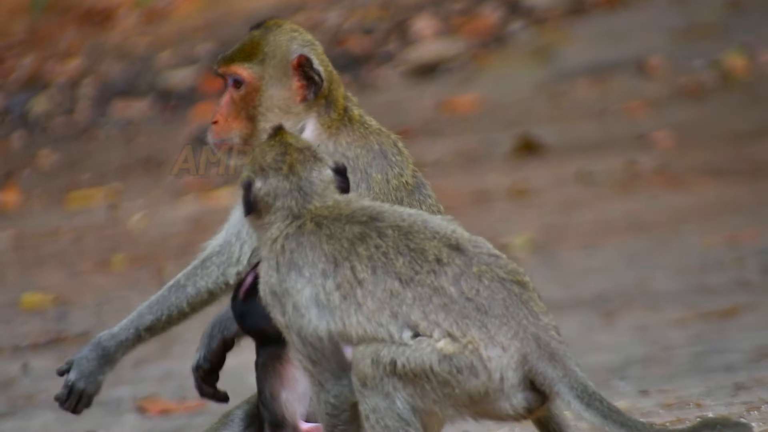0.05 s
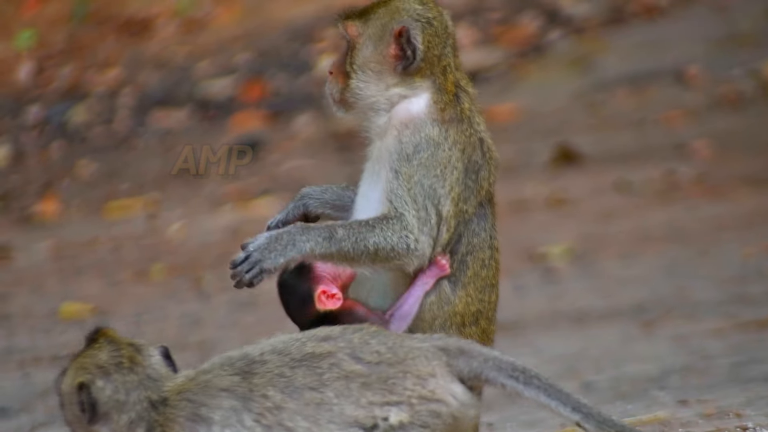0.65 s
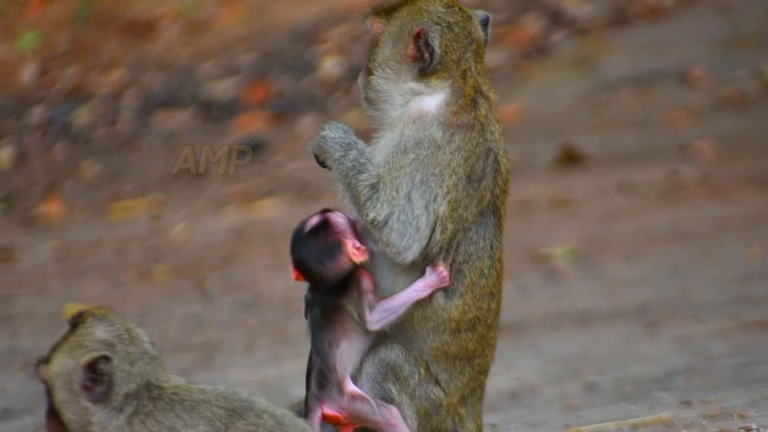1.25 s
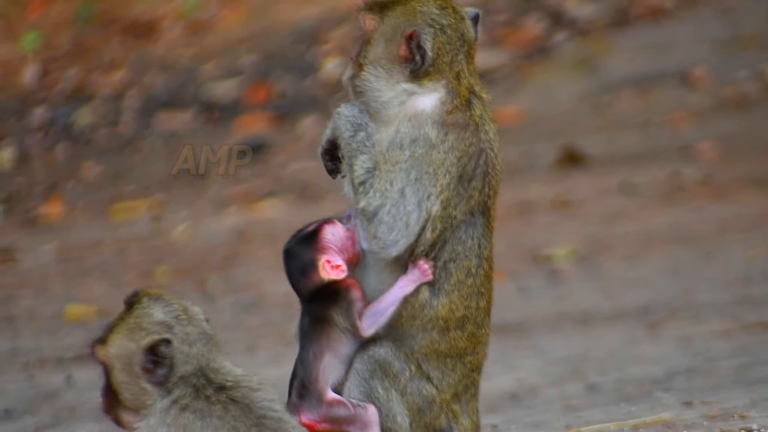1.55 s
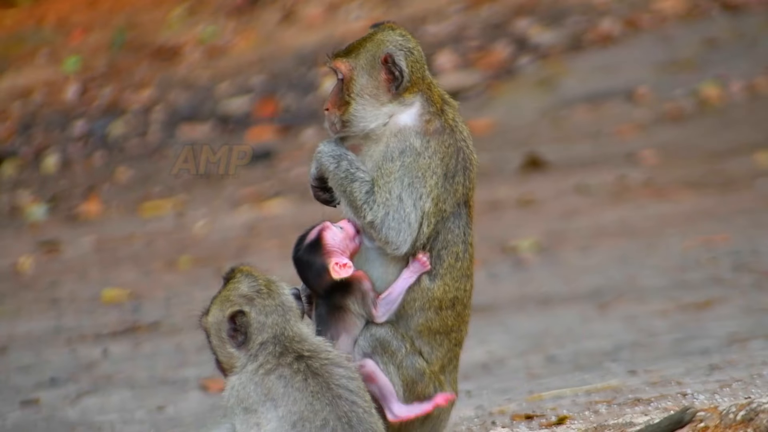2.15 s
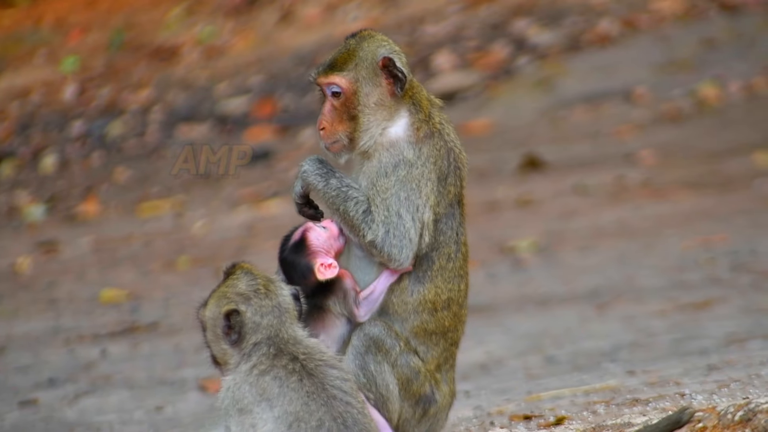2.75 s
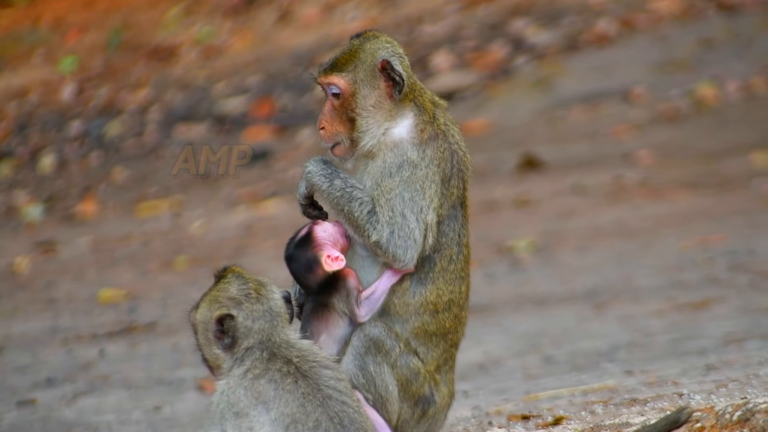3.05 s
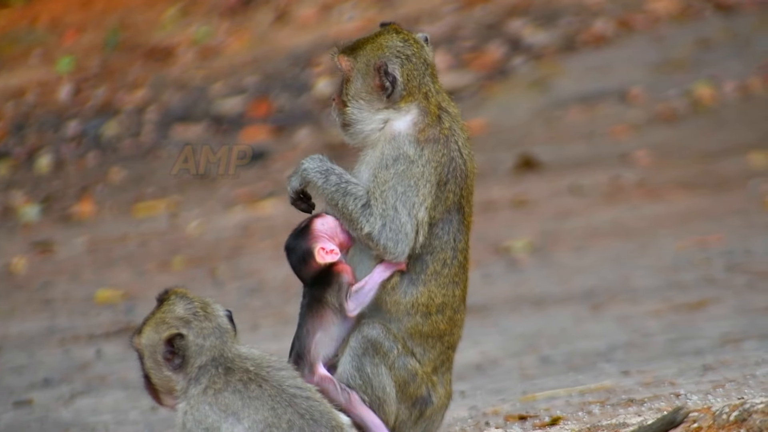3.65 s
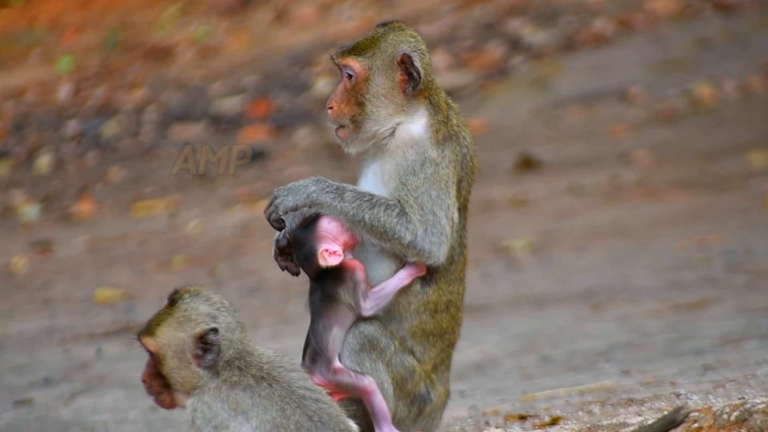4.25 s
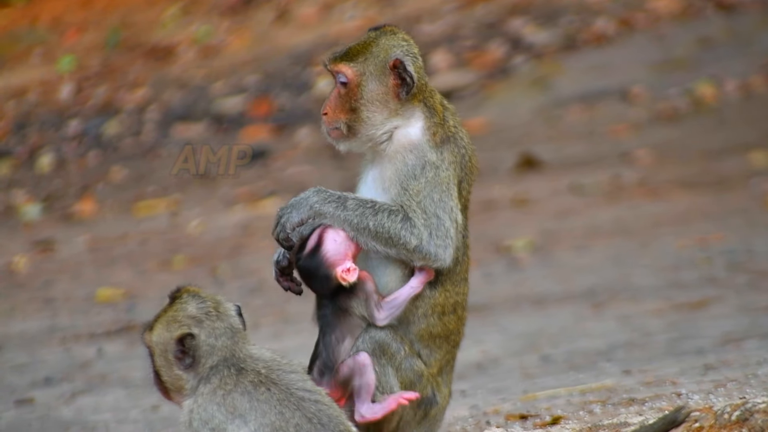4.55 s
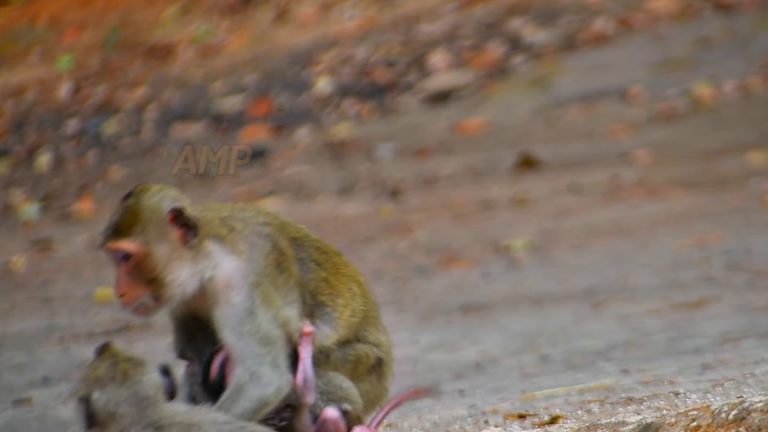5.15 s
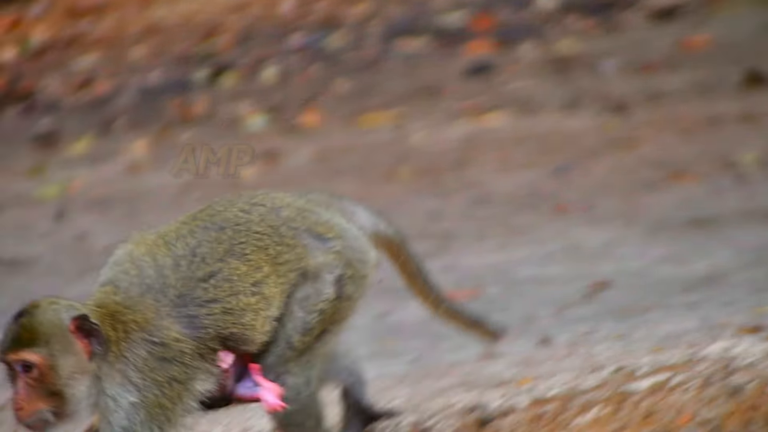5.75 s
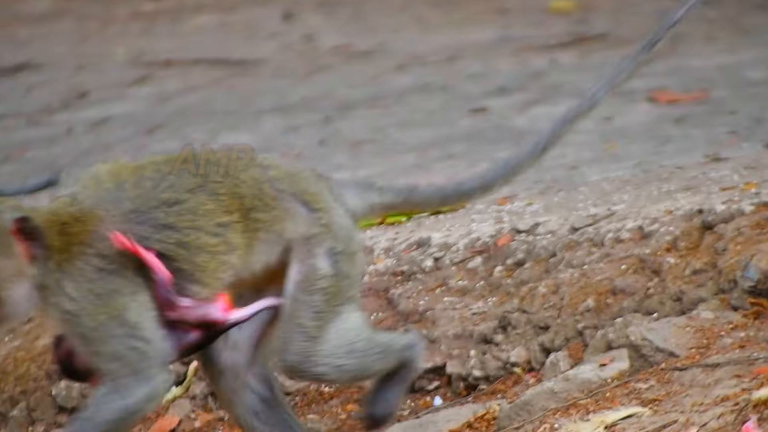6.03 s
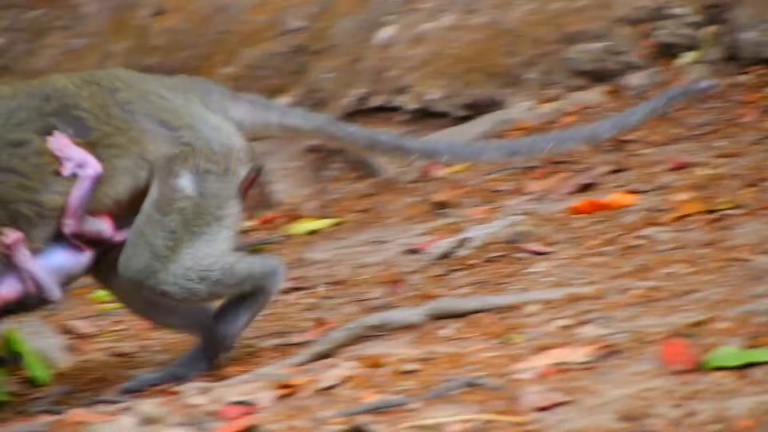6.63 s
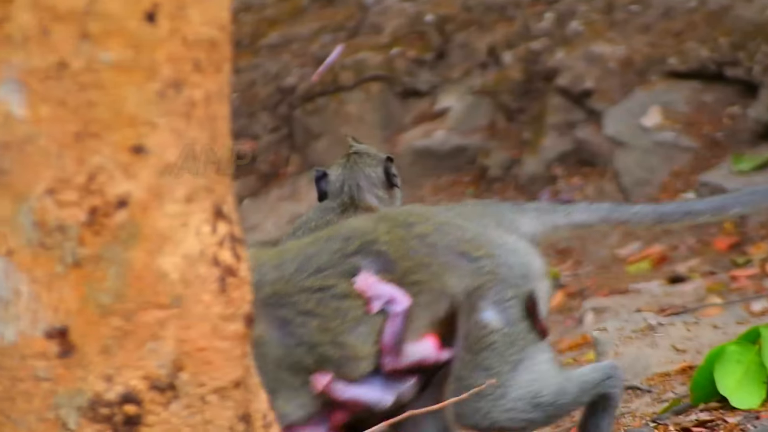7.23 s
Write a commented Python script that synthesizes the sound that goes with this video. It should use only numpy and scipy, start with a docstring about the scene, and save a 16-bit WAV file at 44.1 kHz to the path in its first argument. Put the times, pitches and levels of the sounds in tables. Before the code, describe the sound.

A baby monkey gives two long, shrill, raspy screams outdoors, then fainter squeaks and a thin cry as dry leaves rustle.

```python
"""Infant macaque screaming outdoors

Almost straight ahead of the microphone, overdriven vocal folds give two long, harsh screams that break
into whistles, then squeaks and a thinner cry. Adults tap the ground and step over dry leaves.
Far off, one soft hoot sounds and an engine idles to the right. Trees and a bank return a faint echo."""
import sys
import numpy as np
from scipy import signal
from scipy.fft import rfft, irfft, next_fast_len
from scipy.io import wavfile
from scipy.ndimage import map_coordinates

SR = 44100
rng = np.random.default_rng(int(sys.argv[2]) if len(sys.argv) > 2 else 0)


def to_wav(sig):
    """Store sig (one row per channel, or 1-D mono) as 16-bit WAV at the path in sys.argv[1].

    Samples outside -1..1 are clipped; the rate is SR.
    """
    pcm = np.clip(np.atleast_2d(sig), -1, 1) * 32767
    pcm = np.round(pcm).astype(np.int16)
    wavfile.write(sys.argv[1], SR, pcm.T)  # frames by channels


N = 330309

# The slow course of the long wail and of the second scream.
# Each row: time in seconds, throat pitch in Hz, relative tone level in dB, relative rasp level in dB.
WAIL = [(0.28, 3418, -43.5, -53.5), (0.37, 3420, -53.5, -50), (0.42, 3310, -46.5, -48),
        (0.6, 2997, -49, -50.5), (0.75, 3259, -47, -44), (0.84, 3420, -61, -53.5),
        (1.36, 3740, -57.5, -56.5), (1.54, 4170, -58, -51), (1.91, 4070, -49.5, -53),
        (2.17, 3860, -52, -55.5), (2.45, 3317, -46, -45), (2.62, 2900, -45, -51),
        (2.77, 3525, -41.5, -46.5), (2.92, 4152, -46.5, -43), (3.08, 3240, -44, -51),
        (3.13, 2990, -54, -50), (3.42, 3337, -40.5, -49)]
SCREAM = [(4.58, 3460, -40.5, -62), (4.602, 3453, -42.5, -42.5), (4.676, 3705, -43, -47),
          (4.87, 3718, -34.5, -41.5), (4.93, 3620, -41, -42), (5.066, 3483, -36, -45),
          (5.166, 3103, -35.5, -42.5), (5.33, 2950, -49.5, -45.5)]
WAIL_S, SCREAM_S = (0.283, 4.205), (4.556, 5.515)  # start and end of each
# Surges of effort end the wail and open and close the second scream.
# Each row: centre in seconds, half length in seconds, throat pitch in Hz, gain in dB.
SURGES = [(3.474, 0.057, 3120, 8.5), (3.545, 0.0694, 3106, 11), (3.8, 0.1015, 4020, 13.5),
          (4.125, 0.073, 3150, 6.5), (4.561, 0.029, 3215, 10), (5.486, 0.0487, 2622, 2.5)]
# The mouth gapes and the scream turns shrill; a smeared high overtone swells and rises.
# Each row: centre in seconds, half length in seconds, gain in dB, resonance shift in Hz.
GAPES = [(0.425, 0.104, 14, 250.5), (0.555, 0.136, 17, -150), (0.743, 0.142, 8, 301),
         (0.948, 0.38, 7.5, 250.5), (2.263, 0.158, 6.5, 50.5), (3.195, 0.21, 13, -330),
         (3.84, 0.21, 2.5, -550), (4.103, 0.12, 4.5, -200), (4.62, 0.211, -1.5, -500),
         (5.1, 0.655, 1.5, 200)]
SIZZLES = [(1.751, 0.68, 15.5, 900), (2.75, 0.87, 20, 2100)]
# The folds lock into whistles. Each row: start and length in seconds, first, middle and last pitch
# in Hz, relative level in dB, jitter as a share of the pitch.
WHISTLES = [ (0.243, 0.0334, 3660, 3830, 3810, -43, 0.0059), (.268, 0.0164, 3950, 4279, 3850, -42, 0.0061),
            (0.282, 0.0535, 3320, 3370, 3480, -46, 0.0115), (0.576, .78, 5900, 6249, 6250, -51, 0.0174),
            (1.55, 0.721, 6052, 5532, 5100, -51.5, 0.0826), (2.821, .2, 3904, 4247, 3902, -49.5, .07),
            (3.021, .075, 3600, 3350, 3135, -49.5, 0.0266), (3.09, .36, 2700, 3167, 3285, -48, 0.04023),
            (3.45, .15, 5100, 5229, 5100, -42.5, 0.1032), (3.452, .12, 3220, 3033, 3110, -33.5, 0.0317),
            (3.74, 0.1282, 4577, 4782, 4636, -33.5, 0.0931), (4.02, .11, 9150, 9165, 8700, -32.5, 0.0181),
            (4.058, 0.128, 4900, 4600, 3965, -34, 0.0757), (4.156, 0.0378, 3150, 3131, 2870, -28.5, 0.0077),
            (4.153, 0.0303, 8500, 8316, 8224, -32, 0.01184), (4.185, .025, 4500, 3980, 2880, -35.5, 0.019),
            (5.34, 0.175, 8600, 7900, 6050, -42.5, 0.038), (5.099, 0.455, 3012, 2699, 2351, -51, .11),
            (5.476, 0.0373, 4200, 3906, 2280, -38, 0.084), (6.032, 0.0496, 5000, 5295, 5250, -54.5, 0.0112),
            (6.071, 0.053, 4850, 4740, 4790, -50, 0.0089), (6.417, 0.0507, 4480, 4716, 4685, -53, 0.0104),
            (6.783, 0.044, 6400, 6560, 6560, -46.5, .05), (6.975, 0.272, 5300, 5373, 5650, -52.5, 0.0312),
            (6.898, 0.364, 3100, 2427, 2092, -59, 0.138), ]
# Two squeaks and a thin cry in two parts. Each row: start and length in seconds, first, middle and
# last pitch in Hz, relative levels of tone and of breathy rasp in dB.
WHIMPERS = [(6.04, 0.0964, 5150, 4900, 4870, -46, -65.5), (6.425, 0.105, 4720, 4810, 4950, -55, -57),
            (6.68, 0.1876, 4600, 5143, 5300, -47, -57), (6.87, 0.447, 5348, 6320, 6605, -45.5, -56)]
# The colour of the two rasps, and of the tiny throat, which radiates no low notes.
# Each row: frequency in Hz, gain in dB.
SCREAM_RASP = [(1900, -57), (2500, -52.5), (3200, 3), (4500, 5), (5400, 5.5), (7300, -4), (11000, 6),
               (12200, 8.5), (14300, 5), (16000, 3)]
WHIMPER_RASP = [(2000, -14), (3500, -10), (6000, 2.5), (7500, -1), (8800, 4.5), (11800, -9), (13700, 0),
                (15800, -13)]
THROAT_RESPONSE = [(1400, -56), (2000, -17.5), (2600, -1.5), (3300, -0.5)]
# The infant's head turns. Each row: time in seconds, lean to the left (scaled to dB in from_ahead).
HEAD_TURN = [(0.28, -3), (0.69, 1), (0.96, -2.5), (3.17, 1.5), (5.11, 1.5), (5.5, 1.5)]

# Hands and feet on the ground. Each row: start in seconds, relative level in dB, thud offset in dB.
TAPS = [(0.445, -44.5, -25), (1.093, -54.5, -20.5), (1.629, -48.5, 14), (2.997, -40.5, -31),
        (3.573, -44, -19.5), (3.646, -45.5, -28), (3.764, -46.5, -19), (3.936, -49.5, -18),
        (4.145, -44.5, -7), (4.819, -45.5, -23.5), (4.85, -41, -21), (5.569, -46.5, -0.5),
        (5.788, -48.5, -10)]
# Dry leaves and twigs snap. Each row: start in seconds, relative level in dB, pitch in Hz.
SNAPS = [(1.9253, -43, 6100), (5.6077, -33, 3030), (5.696, -34.5, 3090), (5.9855, -41, 4570),
         (6.0912, -33.5, 4670), (6.2109, -40, 5630), (6.2244, -48, 3070), (6.2962, -39.5, 4700),
         (6.5009, -36.5, 4540), (6.8024, -36.5, 5360), (7.1619, -34.5, 5430), (7.2098, -32.5, 6700)]
# Bursts of rustling in the leaf litter. Each row: centre in seconds, half length in seconds, gain in dB.
STIRS = [(.09, 0.112, 9), (5.5, 0.265, 13.5), (6.17, 0.15, 2.5), (7.36, 0.493, 15)]
# The colour of the leaf litter and of the open air. Each row: frequency in Hz, relative level in dB.
LITTER_SPECTRUM = [(1470, -51.5), (2500, -17), (4260, -13), (4600, -13.5), (6120, -8.5), (7360, -11.5),
                   (9070, -7.5), (11700, -20), (15800, -23.5)]
AIR_SPECTRUM = [(15, -55), (25, -23), (36, -5.5), (48, 2.5), (157, -2), (184, 1.5), (205, -10.5),
                (284, -11), (324, -14.5), (542, -8.5), (710, -16.5), (1930, -16.5), (3680, -23),
                (8970, -26), (15800, -40.5)]
# A distant hoot. Its row: start and length in seconds, first, middle and last pitch in Hz, level in dB.
HOOT = [(4.175, .25, 1160, 1232, 1190, -59)]
# The far engine's harmonics. Each row: multiple of the cycle rate, relative level in dB.
ENGINE_ORDERS = [(1, -29), (2, -28.5), (3, -33), (4, -19.5), (5, 2.5), (6, -28.5), (7, 0.5), (8, 2.5),
                 (9, -2.5), (10, -6), (11, -0.5), (12, -11), (13, 2.5), (14, -8), (15, 2), (16, -7),
                 (17, -17.5), (18, -5), (19, -40), (20, -8.5), (21, -28), (22, -18), (23, -16), (24, -8.5),
                 (25, -33.5), (26, -5.5), (27, -29)]
# The background drifts. Each row: time in seconds, relative levels of engine and of air in dB.
BACKGROUND_LEVELS = [(0.0, -64.5, -63), (0.67, -59, -55.5), (4.04, -53.5, -55), (7.05, -57, -57),
                     (7.49, -58.5, -55.5)]

# The echo from the trees and the bank. Each row: frequency in Hz, seconds to fall by 60 dB.
ECHO_T60 = [(300, 0.304), (3000, 0.628), (6000, 0.87), (9000, 0.597), (15000, 0.554)]
# Diffuse sound at the two microphone ports. Each row: frequency in Hz, left-right correlation.
COHERENCE = [(60, 1), (130, 1), (290, 1), (640, 0.88), (1400, 0.226), (3100, 0.028), (7000, 0.054)]
# The ports differ in colour, and the camera body shades the left one from sound on the right.
# Each row: frequency in Hz, left minus right in dB.
PORT_COLOUR = [(2000, -4), (3500, 0), (6000, -1.5), (8100, 2), (9100, -5.5), (10300, -4.5), (11100, 7.5),
               (12500, -7), (15500, 7.5)]
BODY_SHADOW = [(400, -0.5), (1000, -0.5), (1900, -5), (3500, 1.5)]

EASY_HZ, EASY_WIDTH_HZ = 3050, 484  # the throat's easy pitch and its resonance width there
MOUTH_HZ, SIZZLE_HZ, OVERTONE_HZ = 9098, 12800, 6250  # the higher resonances at rest
HELD_S, HELD_DB, HELD_SAG_DB_PER_S = (0.583, 2.107), -46, 4  # a higher voice held in the quiet of the wail
TOP_HZ = 15900  # the camera's band limit


def screams(jitter=0.0348, calm_tone_share=0.172, flutter_db=0.09, ragged_db=1.5):
    """Overdriven folds: an unsteady tone and a chaotic rasp ring the throat and the open mouth."""
    throat_hz, width_hz, throat_db, rasp_db = effort()
    quaver = 1 + 0.012 * wobble(35)  # the strained throat trembles, moving all resonances together
    tone_share = np.clip(calm_tone_share * EASY_WIDTH_HZ / width_hz, 0, 1)
    tone = unit(np.sin(running_phase(throat_hz * quaver, jitter * wobble(700))))
    chaos = resonance(throat_hz * quaver, width_hz, steep=1.5, steeper_below=1.455)
    throat = np.sqrt(tone_share) * tone + np.sqrt(1 - tone_share) * chaos
    voice = amp(throat_db - 2.94) * unit(throat * amp(ragged_db * wobble(110)))

    held_db = HELD_DB - HELD_SAG_DB_PER_S * (np.arange(N) / SR - HELD_S[0])
    overtone_gain = np.hypot(amp(rasp_db - 6), amp(held_db) * gate(*HELD_S, edge=0.057))
    voice += overtone_gain * resonance(OVERTONE_HZ * quaver, width_hz=600, steep=1)

    mouth_db = (throat_db + rasp_db) / 2 + 3.2 + swells((s, half, db) for s, half, db, _ in GAPES)
    mouth_hz = MOUTH_HZ + swells((s, half, hz) for s, half, _, hz in GAPES)
    voice += amp(mouth_db) * resonance(mouth_hz * quaver, width_hz=1500, steep=3.83)

    sizzle_db = rasp_db - 15 + swells((s, half, db) for s, half, db, _ in SIZZLES)
    sizzle_hz = SIZZLE_HZ + swells((s, half, hz) for s, half, _, hz in SIZZLES)
    voice += amp(sizzle_db) * resonance(sizzle_hz * quaver, width_hz=1700, steep=1.86)
    voice += amp(rasp_db + 3) * noise(SCREAM_RASP)

    pressure = amp(flutter_db * wobble(450) + 0.965 * wobble(45))  # the folds slap irregularly
    sounding = gate(*WAIL_S, edge=0.0102) + gate(*SCREAM_S, edge=0.02)
    return filtered(voice * pressure * sounding, lambda hz: amp(along(THROAT_RESPONSE, hz)))


def effort(weak_below_db=-38, extra_fall=0.143, chaos_power=1.75, surge_widening=0.145):
    """Surges ride on the screams' slow course; the throat tone smears when pushed above its easy pitch."""
    pitches = [(s, hz) for s, hz, *_ in [*WAIL, *SCREAM]] + [(s, hz) for s, _, hz, _ in SURGES]
    throat_hz, = curves(sorted(pitches))
    wail_end = (WAIL_S[1], *WAIL[-1][1:])  # the wail holds its last level
    _, tone_db, rasp_db = curves([*WAIL, wail_end, *SCREAM])
    tone_db += extra_fall * np.minimum(tone_db - weak_below_db, 0)  # a weak voice loses its tone faster
    surge_db = swells((s, half, db) for s, half, _, db in SURGES)
    width_hz = EASY_WIDTH_HZ * (throat_hz / EASY_HZ) ** chaos_power * amp(surge_widening * surge_db)
    return throat_hz, width_hz, tone_db + surge_db, rasp_db + surge_db


def whistles(octave_db=-18):
    """The folds lock into short glides, from pure to hoarse, with a weak octave."""
    stray = wobble(1100) + 0.7 * wobble(110)  # fast jitter on a slower waver
    flutter = amp(1.63 * wobble(250))
    out = np.zeros(N)
    for *arc, db, jitter in WHISTLES:
        pitch_hz, envelope = note(*arc, droop_db=9, edge=0.0093)
        on = envelope > 0
        phase = running_phase(pitch_hz[on], jitter * stray[on])
        octave = amp(octave_db) * (2 * pitch_hz[on] < TOP_HZ) * np.sin(2 * phase)
        out[on] += np.sqrt(2) * amp(db) * envelope[on] * (np.sin(phase) + octave)
    return out * flutter


def whimpers(jitter=0.0225, quaver=0.042):
    """Two hoarse squeaks, then a weak, wavering, rising cry."""
    pitch_hz = np.full(N, float(WHIMPERS[0][2]))
    tone_gain, rasp_gain = np.zeros(N), np.zeros(N)
    for *arc, tone_db, rasp_db in WHIMPERS:
        arc_hz, envelope = note(*arc, droop_db=7, edge=0.016)
        pitch_hz = np.where(envelope > 0, arc_hz, pitch_hz)
        tone_gain += amp(tone_db) * envelope
        rasp_gain += amp(rasp_db) * envelope
    pitch_hz *= 1 + quaver * wobble(40)
    hoarse = amp(-1.5) * resonance(pitch_hz, width_hz=520, steep=1.22)
    clean = amp(-8) * np.sin(running_phase(pitch_hz, jitter * wobble(600)))
    breath = amp(5) * rasp_gain * noise(WHIMPER_RASP)
    return (tone_gain * (hoarse + clean) + breath) * amp(1.58 * wobble(300))


def taps():
    """The adults' hands and feet meet the ground: a short pat over a duller thud."""
    pat = noise([(350, -56), (700, 6.5), (1150, 5.5), (1900, -7.5), (5000, -33)])
    pat *= blows([(s, db) for s, db, _ in TAPS], t60=0.0545)
    thud = noise([(60, -25.5), (170, 9.5), (380, 3.5), (650, 5.5), (1000, -28)])
    thud *= blows([(s, db + thud_db) for s, db, thud_db in TAPS], t60=0.0404)
    return amp(-2.5) * pat + amp(0.5) * thud


def snaps(ring_t60=0.017, crack_t60=0.01065):
    """Each dry leaf or twig cracks and rings briefly at its own pitch."""
    ring, t = np.zeros(N + SR), np.arange(SR // 10) / SR
    for s, db, hz in SNAPS:
        ring[round(s * SR):][:len(t)] += amp(db - 60 * t / ring_t60) * np.sin(2 * np.pi * hz * t)
    crack = noise([(1200, -11.5), (3000, 0.5), (10000, -3), (16000, -26)])
    crack *= blows([(s, db) for s, db, _ in SNAPS], t60=crack_t60)
    return amp(-6.5) * ring[:N] + amp(-2) * crack


def rustle(rest_db=-60.5, grain_db=3, clump_db=2.9):
    """All around the microphone, leaf litter crackles in small clumps under the moving animals."""
    crackle = diffuse(LITTER_SPECTRUM) * amp(grain_db * wobble(500) + clump_db * wobble(25))
    return amp(rest_db + swells(STIRS)) * unit(crackle)


def hoot(jitter=0.02416):
    """One soft, arched note from far off."""
    *arc, db = HOOT[0]
    pitch_hz, envelope = note(*arc, droop_db=5, edge=0.033)
    return amp(db) * envelope * np.sin(running_phase(pitch_hz, jitter * wobble(150)))


def engine(cycle_hz=11.585, scatter_rad=0.802):
    """A far engine idles: odd orders a quarter turn from even ones make two unlike thumps a cycle."""
    level_db, _ = curves(BACKGROUND_LEVELS)
    phase = running_phase(cycle_hz, 0.004074 * wobble(3))
    thumps = np.zeros(N)
    for order, db in ENGINE_ORDERS:
        offset = np.pi / 2 * (round(order) % 2) + scatter_rad * rng.standard_normal()
        thumps += amp(db) * np.cos(order * phase + offset)
    return amp(level_db + 2.5 + wobble(18)) * unit(thumps)


def open_air(waver_db=2.36):
    """The wide hush of the place, its level gently wavering."""
    _, level_db = curves(BACKGROUND_LEVELS)
    trim = [(50, -8.5), (170, -9.5), (280, -0.5), (2500, 0), (6000, -2)]
    hush = filtered(diffuse(AIR_SPECTRUM), lambda hz: amp(along(trim, hz)))
    return amp(level_db + 7 + waver_db * wobble(5.437)) * hush


def outdoors(x, scatter_db, echo_db, scatter_t60=0.0362, size=8192):
    """The ground scatters the sound at once; the trees and the bank answer faintly."""
    hz, t, spectra = signal.stft(rng.standard_normal((2, SR)), SR, nperseg=256)
    echo_decay = amp(-60 * t / along(ECHO_T60, hz)[:, None]) * (t > 0)
    tail = signal.istft(spectra * echo_decay, SR, nperseg=256)[1]
    echo = signal.fftconvolve(x[None], tail / np.linalg.norm(tail[0]), axes=1)[:, :N]
    decay = amp(-60 * np.arange(size // 2) / SR / scatter_t60)
    near, padded = np.zeros((2, N + 2 * size)), np.pad(x, (0, size))
    for start in range(0, N, size // 2):  # the ground paths change as the animals move
        piece = padded[start:start + size] * np.sqrt(np.hanning(size))
        paths = rng.standard_normal((2, size // 2)) * decay / np.linalg.norm(decay)
        heard = signal.fftconvolve(piece[None], paths, axes=1)
        near[:, start:start + heard.shape[1]] += heard
    return x + amp(scatter_db) * near[:, :N] + amp(echo_db) * echo


def from_ahead(x, left_lead_ms=0.02556, db_per_lean=1.29):
    """The infant is almost on the microphone's axis; the balance shifts as its head turns."""
    balance_db = db_per_lean * curves(HEAD_TURN)[0]
    return microphone(x, PORT_COLOUR, left_lead_ms) * amp([balance_db / 2, -balance_db / 2])


def from_right(x):
    """Sound from the right reaches the left port late, and weaker in the midrange."""
    return microphone(x, BODY_SHADOW, left_lead_ms=-0.205)


def microphone(x, balance, left_lead_ms):
    """Two ports hear a sound a moment apart and with unlike colour."""
    sides = np.array([[0.5], [-0.5]])
    lead_s = sides * left_lead_ms / 1000
    return filtered(x, lambda hz: amp(sides * along(balance, hz)) * np.exp(2j * np.pi * hz * lead_s))


def diffuse(spectrum):
    """Stereo noise from all around: alike in the bass, unrelated in the treble."""
    def mid_and_side(hz):
        angle = np.arccos(np.clip(along(COHERENCE, hz), -1, 1)) / 2
        return np.array([np.cos(angle), np.sin(angle)])
    mid, side = filtered(np.array([noise(spectrum), noise(spectrum)]), mid_and_side)
    return np.array([mid + side, mid - side]) / np.std(mid)


def resonance(centre_hz, width_hz, steep, steeper_below=1):
    """Chaotic airflow rings a moving resonance at steady power; steep sets the fall of its skirts."""
    hz, t, spectra = signal.stft(rng.standard_normal(N), SR, nperseg=512)
    at = np.minimum((t * SR).astype(int), N - 1)
    detune = 2 * (hz[:, None] - centre_hz[at]) / (width_hz * np.ones(N))[at]
    skirt = np.where(detune < 0, steep * steeper_below, steep)
    shape = (1 + detune ** 2 / skirt) ** (-skirt / 2)
    shape /= np.linalg.norm(shape, axis=0)
    return unit(signal.istft(spectra * shape, SR, nperseg=512)[1][:N])


def note(s, length, first_hz, middle_hz, last_hz, droop_db, edge):
    """Pitch and envelope of a short call: one smooth arc, loudest in the middle."""
    u = np.clip(2 * (np.arange(N) / SR - s) / length - 1, -1, 1)  # -1 to 1 across the call
    bend_hz = (first_hz + last_hz) / 2 - middle_hz
    pitch_hz = middle_hz + u * (last_hz - first_hz) / 2 + u * u * bend_hz
    return pitch_hz, amp(-droop_db * u * u) * gate(s, s + length, edge)


def running_phase(pitch_hz, jitter):
    """Phase of a vibration whose pitch strays by the share jitter."""
    return 2 * np.pi * np.cumsum(pitch_hz * (1 + jitter)) / SR


def blows(events, t60, attack_s=0.000171):
    """Envelope of (s, dB) contacts that each die away in t60 seconds."""
    out, t = np.zeros(N + SR), np.arange(SR // 4) / SR
    for s, db in events:
        out[round(s * SR):][:len(t)] += amp(db - 60 * t / t60) * (1 - np.exp(-t / attack_s))
    return out[:N]


def swells(rows):
    """Sum of (centre s, half length s, height) swells that rise and fall evenly."""
    t = np.arange(N) / SR
    return sum(np.interp(t, [s - half, s, s + half], [0, height, 0]) for s, half, height in rows)


def gate(start, end, edge):
    """1 from start to end, with ramps of edge seconds."""
    t = np.arange(N) / SR
    return np.sqrt(np.clip(np.minimum(t - start, end - t) / edge + 0.5, 0, 1))


def curves(rows):
    """One value per sample for each column after the time."""
    s, *columns = np.transpose(rows)
    return [np.interp(np.arange(N) / SR, s, column) for column in columns]


def wobble(rate):
    """A smooth random curve, rate knots a second."""
    knots = rng.standard_normal(int(N * rate / SR) + 4)
    return map_coordinates(knots, [np.arange(N) * rate / SR])


def noise(spectrum):
    """Noise of rms 1, coloured by (Hz, dB) points."""
    return unit(filtered(rng.standard_normal(N), lambda hz: amp(along(spectrum, hz))))


def filtered(x, response):
    """x through a response that is a function of frequency."""
    size = next_fast_len(N + SR // 2)
    return irfft(rfft(x, size) * response(np.fft.rfftfreq(size, 1 / SR)), size)[..., :N]


def along(points, hz):
    """(Hz, value) points read on a log axis."""
    point_hz, values = np.transpose(points)
    return np.interp(np.log(hz + 1), np.log(point_hz + 1), values)


def amp(db):
    """Decibels to gain."""
    return 10 ** (np.asarray(db) / 20)


def unit(x):
    """Scale to rms 1."""
    return x / np.sqrt(np.mean(x ** 2) + 1e-20)


def scene():
    """The infant ahead, the adults in the leaves, and the far background to the right."""
    infant = from_ahead(outdoors(screams() + whistles() + whimpers(), scatter_db=0, echo_db=-6))
    steps_and_hoot = outdoors(taps() + amp(-4.5) * snaps() + hoot(), scatter_db=-2.5, echo_db=-5)
    return amp(-0.5) * infant + steps_and_hoot + rustle() + from_right(engine() + open_air())


def record(dry):
    """The camera keeps nothing above its band limit."""
    return filtered(dry, lambda hz: hz < TOP_HZ)


dry = scene()
out = record(dry)
to_wav(out)
```